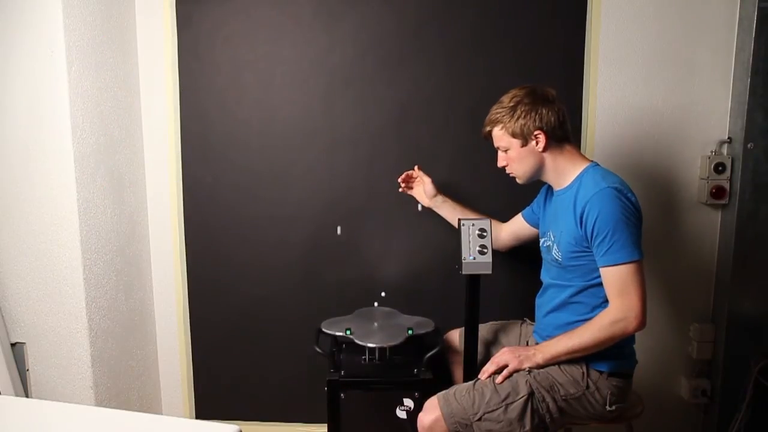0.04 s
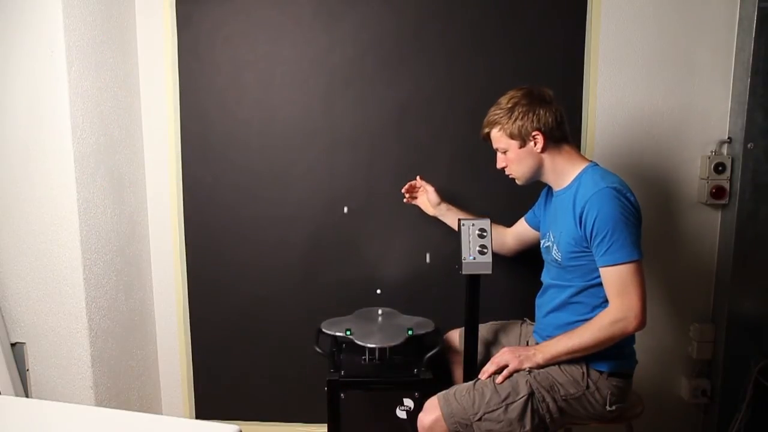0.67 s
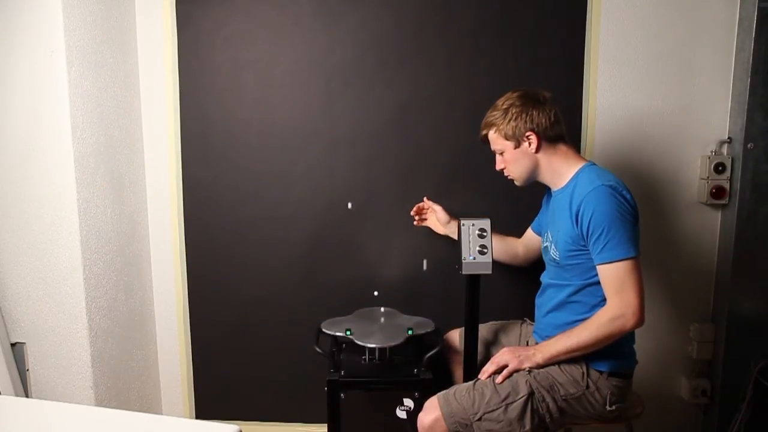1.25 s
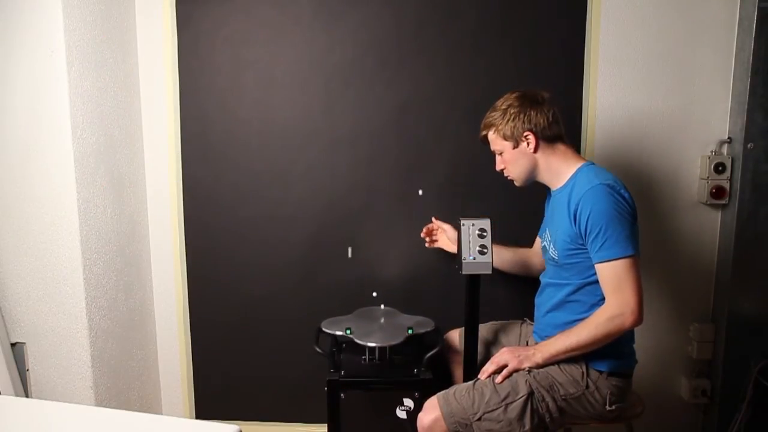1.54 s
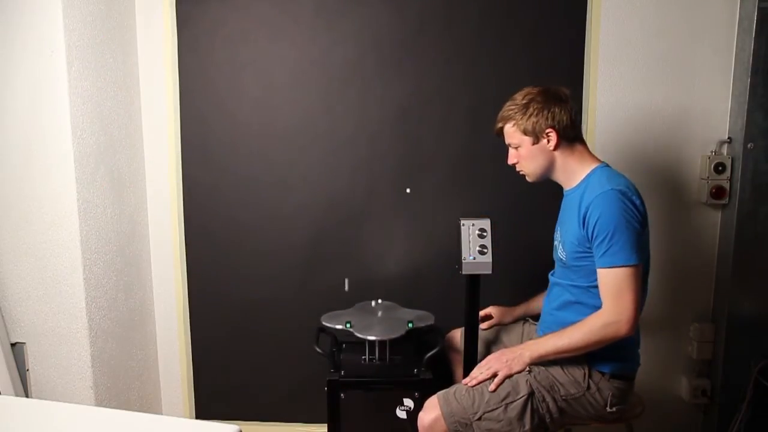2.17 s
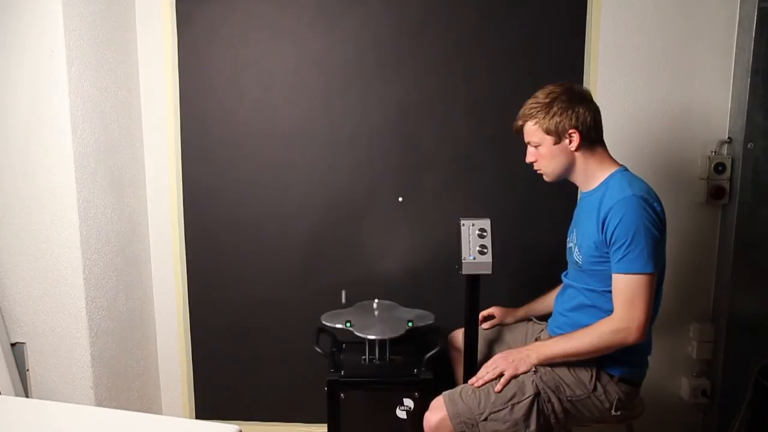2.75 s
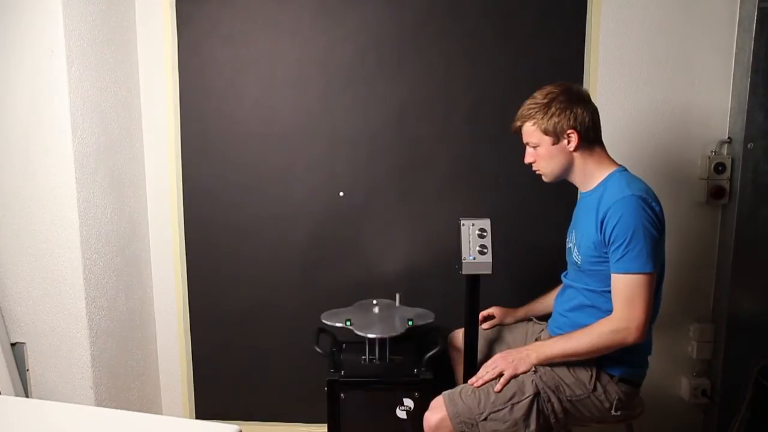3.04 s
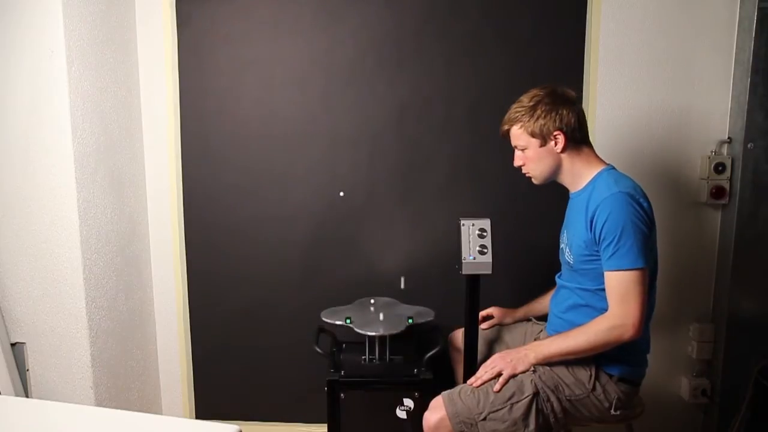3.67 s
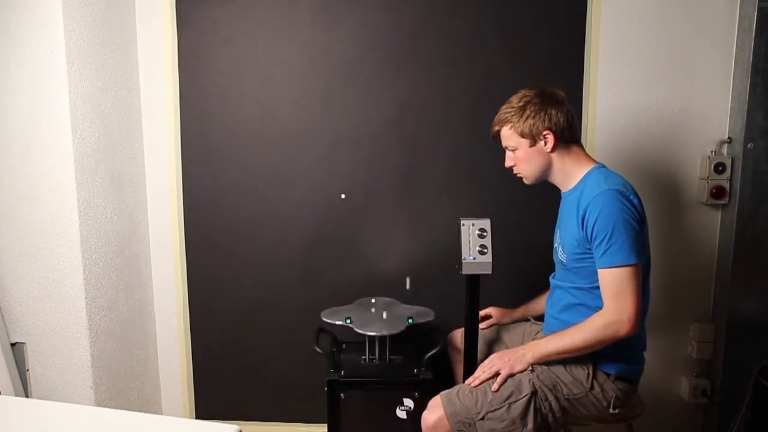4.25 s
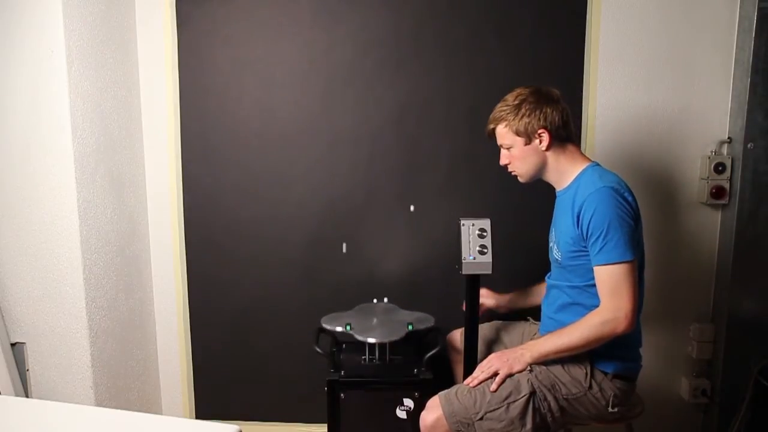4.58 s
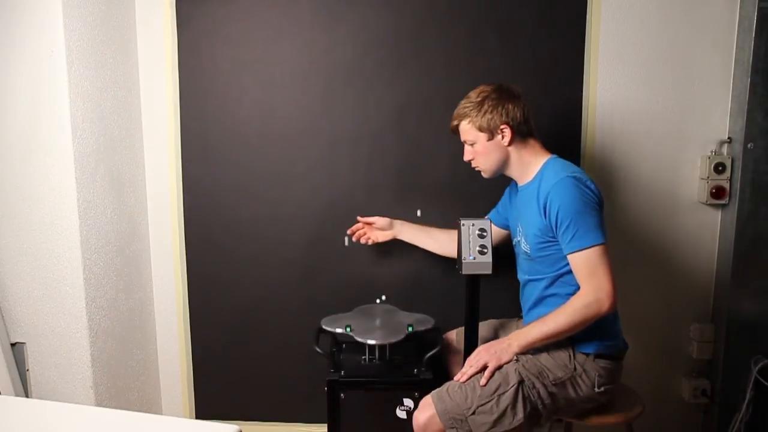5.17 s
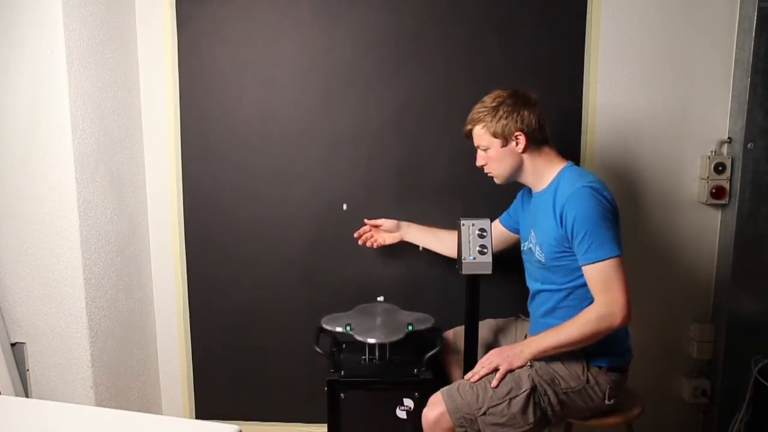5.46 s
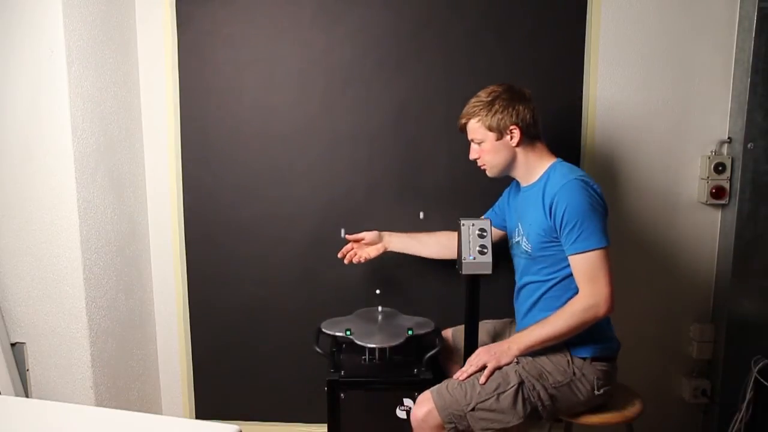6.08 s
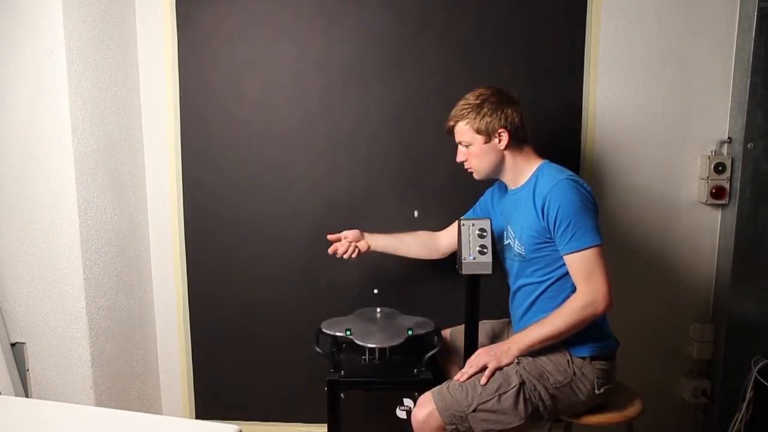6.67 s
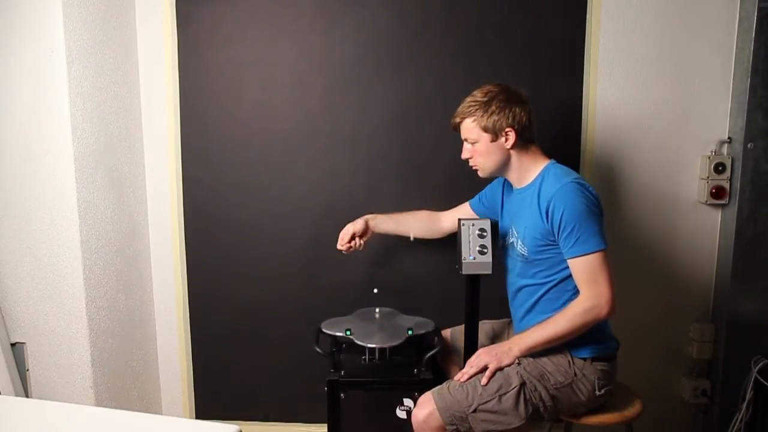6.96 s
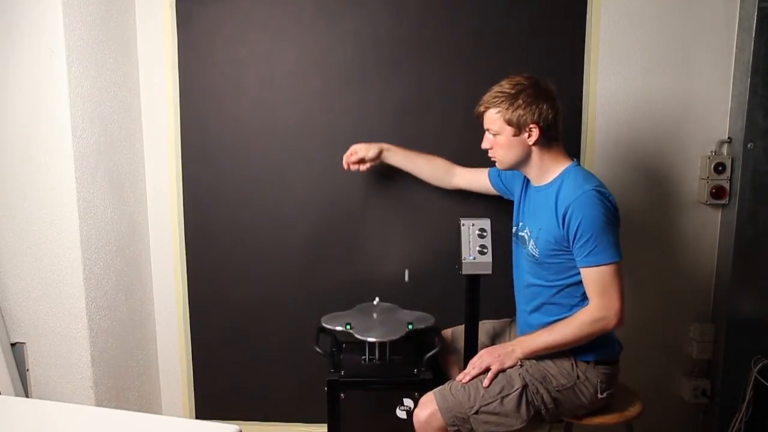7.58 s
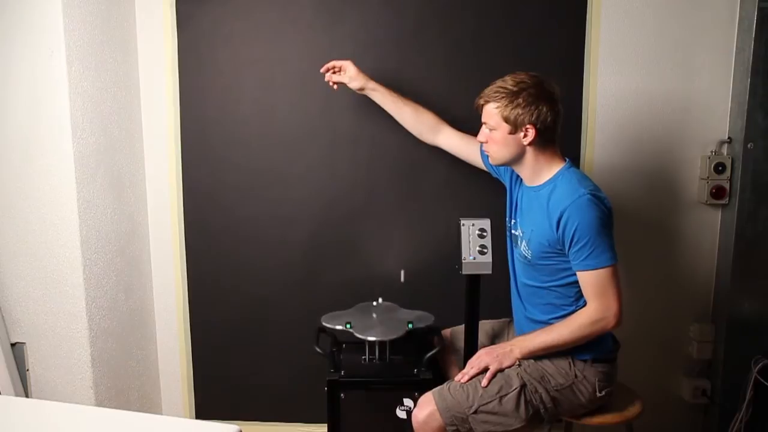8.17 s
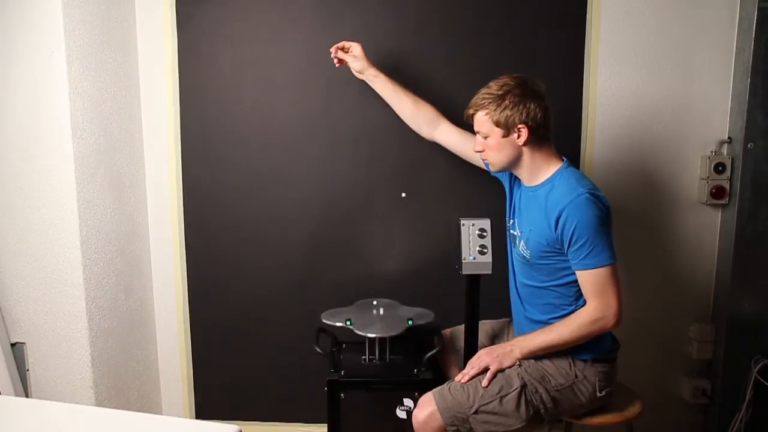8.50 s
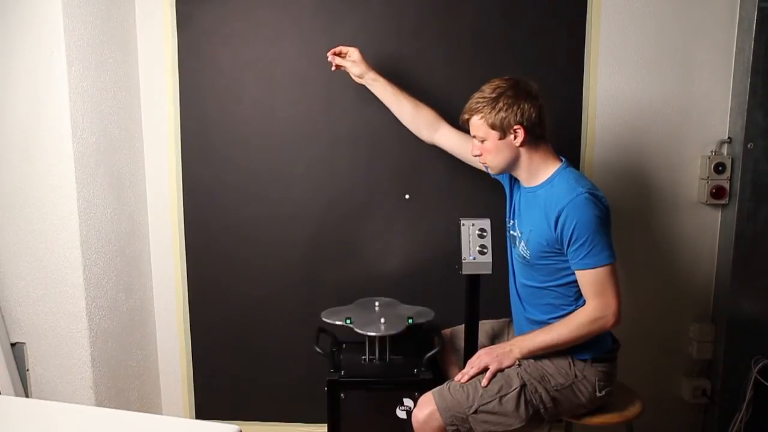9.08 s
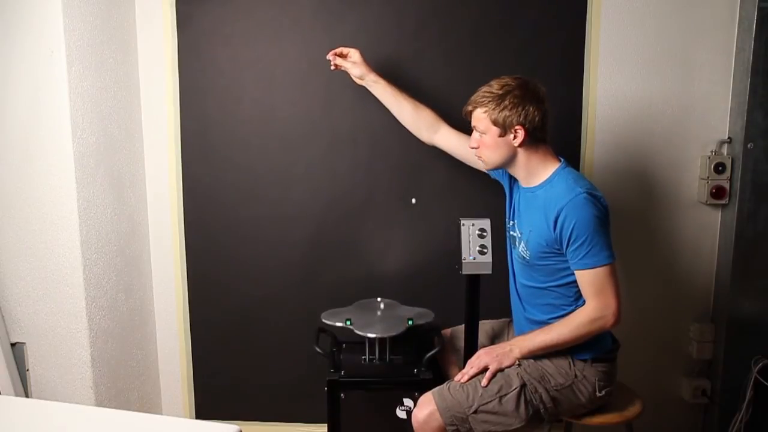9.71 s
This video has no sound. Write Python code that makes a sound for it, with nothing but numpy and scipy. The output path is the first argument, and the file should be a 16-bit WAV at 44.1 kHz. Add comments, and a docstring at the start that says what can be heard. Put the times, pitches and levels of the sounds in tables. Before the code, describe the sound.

A machine pumps a metal plate with a low, pulsing growl and regular clacks while small balls click on it in a quick, even rhythm. The hits are bright and ring briefly, each a little different in colour, with softer ticks among them. After about six and a half seconds the louder landings thin out, but the lighter ticks and motor carry on. The sound is mono, with the short echo and quiet background of a small room.

```python
"""Juggled balls click on a metal plate and ring its beating modes, in a small lab.
Several balls fly high; one centre ball bounces low, once per stroke.
A linear motor pumps the plate 3.5 times a second. Its force shakes the frame with the same growl
in every stroke, and the drive clacks as it turns round. Room tone lies underneath."""
import sys
import numpy as np
from scipy import signal
from scipy.fft import rfft, irfft
from scipy.io import wavfile

SR = 44100
rng = np.random.default_rng(int(sys.argv[2]) if len(sys.argv) > 2 else 0)


def unload_wav(signal):
    """Save mono or channel-first audio to the path in sys.argv[1] as 16-bit WAV at rate SR, clipped to [-1, 1]."""
    wavfile.write(
        sys.argv[1],
        SR,
        np.round(np.clip(np.atleast_2d(signal).T, -1, 1) * 32767).astype(np.int16),
    )


N = 438354
STROKE_S = 0.286

# plate modes, four main ones first: pitch_hz
PLATE_HZ = [1441.5, 1747, 2294.5, 3120, 1055, 1883, 2475, 3022, 3235, 3830, 4288, 4579, 5082, 5410, 5830,
            6864, 7850, 8407, 9480, 10150, 10665]
# same modes: ring_db, t60_s, dense_lift_db
PLATE_MODES = [(1, 0.56, 20), (-1.5, 0.31, 3.5), (-7.5, 0.67, 17.5), (-7.5, 0.54, 17.5), (-27.5, 0.85, 19),
               (-26, 0.92, 5), (-15.5, 0.09, 11.5), (-28, 0.28, 5), (-36, 1, 11), (-31, 0.96, 3),
               (-25.5, 0.076, 12.5), (-32, 0.96, 12), (-28.5, 0.33, 8), (-33, 1, 3.5), (-39, 0.13, 5),
               (-24, 0.18, 7), (-13.5, 0.052, -19), (-22, 0.18, -1), (-20.5, 0.2, 8), (-18, 0.12, -32),
               (-22, 0.12, -2)]
# slow level drift of motor, clacks and room tone: time_s, gain_db
LEVEL_DRIFT = [(0, 0), (1.2, -1), (2.2, 1.5), (3.5, 1.55), (5, 1.1), (6.1, -0.5), (7, 2), (8.2, 2.7),
               (9, 2.5), (9.9, 3.5)]


def amp(db):
    """Decibels to gain."""
    return 10 ** (np.asarray(db) / 20)


def unit_rms(x):
    """Scale to rms 1."""
    return x / np.sqrt(np.mean(x ** 2) + 1e-20)


def white(size):
    """Flat-spectrum noise, rms 1."""
    return unit_rms(irfft(np.exp(2j * np.pi * rng.random(size // 2 + 1)), size))


def follow(curve, time_s):
    """Each value column of a curve, interpolated at time_s."""
    times_s, *columns = np.transpose(curve)
    return [np.interp(time_s, times_s, column) for column in columns]


def spectrum_gain(points, hz):
    """Gain through (freq_hz, level_db) points on a log-frequency axis."""
    freq_hz, level_db = np.transpose(points)
    return amp(np.interp(np.log(hz + 1), np.log(freq_hz + 1), level_db))


def resonance_gain(peaks, hz):
    """Resonances rising out of a flat response."""
    return np.sqrt(1 + sum(abs(amp(db) ** 2 - 1) / (1 + (2 * (hz - centre_hz) / width_hz) ** 2) ** 2
                           for centre_hz, width_hz, db in peaks))


def causal(gain):
    """Minimum-phase response: rings only after the blow."""
    log_gain = np.log(np.r_[gain, gain[-2:0:-1]] + 1e-6)
    return np.exp(np.conj(signal.hilbert(log_gain)))[:len(gain)]


def add(mix, start_s, sound):
    """Mix in a sound; start_s may be negative."""
    at = round(start_s * SR)
    sound = sound[max(-at, 0):]
    part = mix[max(at, 0):][:len(sound)]
    part += sound[:len(part)]


def room_tone(level_db=-58):
    """Steady coloured noise."""
    # room spectrum: freq_hz, density_db
    spectrum = [(25, -21), (70, -13), (105, -1), (135, -9), (175, 10.5), (205, -13), (270, -24), (350, 1.5),
                (700, -5.5), (1500, 0), (4000, -9.5), (12000, -26.5)]
    gain = spectrum_gain(spectrum, np.fft.rfftfreq(N, 1 / SR))
    return amp(level_db) * unit_rms(irfft(rfft(white(N)) * gain, N))


def frame_response(size):
    """Broad drive colour through the frame's resonances."""
    # drive spectrum: freq_hz, density_db
    spectrum = [(30, -37), (65, -26), (100, -15.5), (135, -18.5), (250, -3.5), (350, -9.5), (450, -6),
                (620, -9), (800, -6), (950, -13), (1300, -10.5), (3000, -18), (8000, -46), (12000, -65)]
    # frame resonances: centre_hz, width_hz, strength_db
    resonances = [(148.6, 25, 15), (172.6, 17, 14.5), (248.2, 42, 10.5), (284.2, 7.4, 12.5),
                  (299, 36.5, 9.5), (350, 6.7, -7), (584.7, 65, 9), (639, 15, 10), (722, 81, 3)]
    hz = np.fft.rfftfreq(size, 1 / SR)
    return causal(spectrum_gain(spectrum, hz) * resonance_gain(resonances, hz))


def motor(level_db=-52, rustle_db=-13):
    """One rough force pattern shakes the frame every stroke, with a little fresh noise on top."""
    # motor force over a stroke: time_s, level_db
    force_curve = [(0, -13.5), (.028, -6), (.048, -1.5), (.07, 6), (.12, 0), (.16, 3), (.2, 4), (.24, 1),
                   (.255, -25.5), (.286, -12)]
    # frame booms in a stroke: peak_s, pitch_hz, level_db, half_width_s
    frame_booms = [(0.095, 262, -46.5, 0.011), (0.11, 174, -51.5, 0.055), (0.195, 575, -57, 0.0078),
                   (0.0753, 690, -53.5, 0.0091)]
    size = 2 * round(STROKE_S * SR / 2)
    in_stroke_s = np.arange(N) / SR % STROKE_S
    force = amp(follow(force_curve, in_stroke_s)[0])
    pattern = white(size)
    for _ in range(3):  # shape in time, flatten in frequency
        flat = np.exp(1j * np.angle(rfft(pattern * np.sqrt(force[:size]))))
        pattern = irfft(flat, size)
    one_stroke = irfft(flat * frame_response(size), size)
    growl = unit_rms(np.interp(in_stroke_s * SR, np.arange(size), one_stroke))
    rustle = unit_rms(irfft(rfft(white(N) * force) * frame_response(N), N))
    mix = amp(level_db) * (growl + amp(rustle_db) * rustle)
    for peak_s, pitch_hz, boom_db, half_width_s in frame_booms:
        envelope = amp(boom_db) * np.exp(-((in_stroke_s - peak_s) / half_width_s) ** 2)
        mix += envelope * np.sqrt(2) * np.sin(2 * np.pi * (pitch_hz * in_stroke_s + rng.random()))
    return mix


def plate_colour(hz, width_hz=110):
    """Dense ringing of plate and room, lifted around each mode."""
    # dense ringing: freq_hz, density_db
    spectrum = [(300, -26.5), (850, -21), (1100, -10), (2000, 0.5), (2750, -0.5), (3700, 3), (4800, -1.5),
                (5500, 4), (6250, 1), (7100, 5), (8650, 3), (9500, 2.5), (11600, 0.5), (12300, -10)]
    peaks = [(mode_hz, width_hz, lift_db) for mode_hz, (_, _, lift_db) in zip(PLATE_HZ, PLATE_MODES)]
    return spectrum_gain(spectrum, hz) * resonance_gain(peaks, hz)


def plate_modes(t, beat_hz=2.87, attack_s=0.002):
    """Decaying modes, one per row; the plate's symmetry makes close pairs that beat."""
    ring_db, t60_s, _ = np.transpose(PLATE_MODES)[:, :, None]
    swell = np.cos(np.pi * beat_hz * t) * (1 - np.exp(-t / attack_s))
    return amp(ring_db - 60 * t / t60_s) * swell * np.exp(2j * np.pi * np.outer(PLATE_HZ, t))


def burst(t, hz, centre_hz, width_hz, delay_s, decay_s):
    """Short puff of band noise; each call of the result draws a new one."""
    band = causal(unit_rms(np.exp(-((hz - centre_hz) / width_hz) ** 2) + 0.061))
    envelope = (t >= delay_s) * np.exp(-abs(t - delay_s) / decay_s)
    return lambda: irfft(rfft(white(len(t)) * envelope) * band, len(t))


def ripple(hz, spacing_hz=308):
    """Random hills and valleys along frequency, rms 1."""
    return unit_rms(np.interp(hz / spacing_hz, np.arange(2048), rng.standard_normal(2048)))


def strikes(hz, colour, start_s, level_db, main_db, knock_db, *, click_db, other_modes_db, glint_db,
            crack_db, crack_s, echo_db, echo_s, echo_decay_s, tail_t60_s, alike, ripple_db=0):
    """Blows on the plate: crack, first echo and dense tail over the ringing modes."""
    size = 2 * (len(hz) - 1)
    t = np.arange(size) / SR
    body, modes = causal(unit_rms(colour)), plate_modes(t)
    crack = amp(crack_db) * np.exp(-t / crack_s)
    echo = amp(echo_db) * (t > echo_s) * np.exp(-abs(t - echo_s) / echo_decay_s)
    tail = amp(-60 * t / tail_t60_s)
    envelope = np.sqrt(crack ** 2 + echo ** 2 + tail ** 2)
    knock = burst(t, hz, centre_hz=3940, width_hz=860, delay_s=0, decay_s=0.0051)
    # top treble, beamed up and thrown back by the ceiling
    glint = burst(t, hz, centre_hz=10130, width_hz=1600, delay_s=0.0054, decay_s=0.0033)
    shared = white(size)  # same plate, same room: blows are partly alike
    knock_gain = np.broadcast_to(amp(knock_db), len(start_s))
    mix = np.zeros(N)
    for i, blow_db in enumerate(level_db):
        noise = np.sqrt(alike) * shared + np.sqrt(1 - alike) * white(size)
        spot_colour = amp(ripple_db * ripple(hz))  # landing spot colours the click
        click = amp(blow_db + click_db) * irfft(rfft(noise * envelope) * body * spot_colour, size)
        snap = knock_gain[i] * knock() + amp(blow_db + glint_db) * glint()
        drive_db = blow_db + other_modes_db + 2.8 * rng.standard_normal(len(modes))
        drive_db[:4] = main_db[i]
        drive = amp(drive_db) * np.exp(2j * np.pi * rng.random(len(modes)))
        ring = (drive[:, None] * modes).real.sum(0)
        add(mix, start_s[i], click + snap + ring)
    return mix


def drive_clacks(hz, scatter_db=1):
    """The drive clacks at each turn; a louder drive rings the first mode more."""
    # turns in a stroke: offset_s, level_db
    turns = [(0.1261, 0), (.2505, -8.5)]
    # waxing and waning 2-4 kHz ring: time_s, gain_db
    upper_ring = [(0, -12), (2.1, 9.5), (2.8, 6), (4.3, -18), (5.1, -2), (6.9, 11), (7.5, 7.5), (8.6, -6),
                  (9.4, -13)]
    # clack colour on top of the plate's: freq_hz, gain_db
    tint = [(1050, 14), (1500, 0.5), (2000, 8), (3200, 2.5), (5000, 2.5), (8000, 2), (11500, 3.5)]
    start_s, turn_db = np.transpose([(stroke_s + offset_s, db) for stroke_s in np.arange(0, N / SR, STROKE_S)
                                     for offset_s, db in turns])
    (drift_db,), (ring_db,) = follow(LEVEL_DRIFT, start_s), follow(upper_ring, start_s)
    main_db = np.column_stack([-45.5 + 2.6 * drift_db, -55 + drift_db,
                               -44 + 0.92 * ring_db, -45 + ring_db])
    main_db += turn_db[:, None] + scatter_db * rng.standard_normal(main_db.shape)
    colour = plate_colour(hz) * spectrum_gain(tint, hz)
    return strikes(hz, colour, start_s, turn_db - 29 + drift_db, main_db,
                   knock_db=turn_db - 47 + 0.92 * ring_db,
                   click_db=-12.5, other_modes_db=-3, glint_db=-33, crack_db=-12, crack_s=0.0035,
                   echo_db=2, echo_s=0.0023, echo_decay_s=0.016, tail_t60_s=0.36, alike=0.93)


def centre_ball(hz, offset_s=0.2596, mode2_db=-58, mode4_db=-38.5, scatter_db=2):
    """One low bounce per stroke, alternately hard and soft; the ring varies with the landing spot."""
    # bounce over time: time_s, mean_db, swing_db, mode1_db, mode3_db
    bounce = [(0, -19, -1, -42, -41), (.5, -23, 1.5, -45.5, -40), (1.4, -23.5, 1, -41, -31),
              (2, -26, -1.5, -52, -31), (2.6, -27, 3, -50, -45), (3.2, -22.5, -1, -46.5, -47),
              (3.9, -27.5, 2.5, -49, -40), (4.4, -26.5, -2, -35, -49), (5.7, -24, 4.5, -48.5, -55),
              (6.4, -25.5, -1, -37, -40), (6.9, -20, -2.5, -36, -30), (7.6, -21.5, -1.5, -38, -30),
              (8.1, -20.5, -2, -37.5, -36), (8.8, -22, -3.5, -34, -33), (9.9, -19, -0.5, -33.5, -41.5)]
    stroke = np.arange(-1, int(N / SR / STROKE_S))
    start_s = offset_s + stroke * STROKE_S
    mean_db, swing_db, mode1_db, mode3_db = follow(bounce, start_s)
    level_db = mean_db + swing_db * np.cos(np.pi * stroke)
    main_db = np.column_stack(np.broadcast_arrays(mode1_db, mode2_db, mode3_db, mode4_db))
    main_db += scatter_db * rng.standard_normal(main_db.shape)
    return strikes(hz, plate_colour(hz), start_s, level_db, main_db, knock_db=-56,
                   click_db=-19, other_modes_db=-5, glint_db=-17.5, crack_db=6, crack_s=0.0033,
                   echo_db=5.5, echo_s=0.0017, echo_decay_s=0.0094, tail_t60_s=0.37, alike=0.11)


def high_balls(hz):
    """High balls land; the nearer a node of the first mode, the more the second rings instead."""
    # landings: start_s, level_db, spot (0-1, 1 on the node), mode3_db, mode4_db, knock_db
    landings = [(.258, -22.5, 0.74, -48, -35, -28), (0.5208, -20, 0.3, -51, -37, -35),
                (.7936, -20.5, 1, -27.5, -31, -29), (1.0916, -21, 0.55, -36, -49, -34),
                (1.3577, -21.5, 0.8, -31, -52, -42), (1.6687, -20, 0.3, -29.5, -51, -41),
                (1.955, -18.5, 0.23, -33, -35, -40), (2.2407, -20.5, 0, -25, -48, -51),
                (2.5368, -20, 0, -41, -50, -30), (2.807, -20, 0.2, -25, -49, -32),
                (3.0954, -20, 0.93, -46, -49, -33), (3.3803, -20, 0.2, -32, -50, -37),
                (3.6648, -20.5, 0.3, -27.5, -49, -32), (3.9565, -20, 0, -26, -38, -42),
                (4.2423, -19.5, 0.46, -49, -41, -36), (4.5268, -19.5, 0, -36, -32, -45),
                (4.8126, -19.5, 0.4, -56, -49, -32), (5.0963, -19.5, 0, -35, -41, -43),
                (5.3808, -21, 0.63, -56, -41, -28.5), (5.6695, -20, 0.23, -50, -43, -32),
                (5.9563, -21, 0.7, -42, -37, -29), (6.2428, -21, 0.16, -27.5, -56, -38),
                (6.53, -21, 0.5, -27, -43, -33), (7.0989, -20, .25, -36, -51, -32),
                (7.671, -21, 0.42, -24, -42, -30.5), (8.2485, -19.5, .35, -45, -57, -32),
                (8.817, -20, 0, -39, -52, -34), (9.3835, -19, 0.26, -39, -56, -32)]
    start_s, level_db, spot, mode3_db, mode4_db, knock_db = np.transpose(landings)
    mode1_db = -35.5 - 35 * spot ** 2
    mode2_db = -62.5 + 26.5 * spot
    main_db = np.column_stack([mode1_db, mode2_db, mode3_db, mode4_db])
    return strikes(hz, plate_colour(hz), start_s, level_db, main_db, knock_db,
                   click_db=-16.5, other_modes_db=-7.5, glint_db=-11, crack_db=2.5, crack_s=0.01,
                   echo_db=6, echo_s=0.0081, echo_decay_s=0.0061, tail_t60_s=0.47, alike=0.26,
                   ripple_db=2)


def scene(blow_samples=20000):
    """Balls, drive and room tone, mono."""
    hz = np.fft.rfftfreq(blow_samples, 1 / SR)
    impacts = high_balls(hz) + centre_ball(hz) + drive_clacks(hz)
    (drift_db,) = follow(LEVEL_DRIFT, np.arange(N) / SR)
    hum = (motor() + room_tone()) * amp(drift_db)
    return (impacts + hum)[None]


def record(dry):
    """Low-pass at 12.2 kHz."""
    lowpass = signal.firwin(201, 12200, window=("kaiser", 8), fs=SR)
    return signal.oaconvolve(dry, lowpass[None], "same")


dry = scene()
out = record(dry)
unload_wav(out)
```